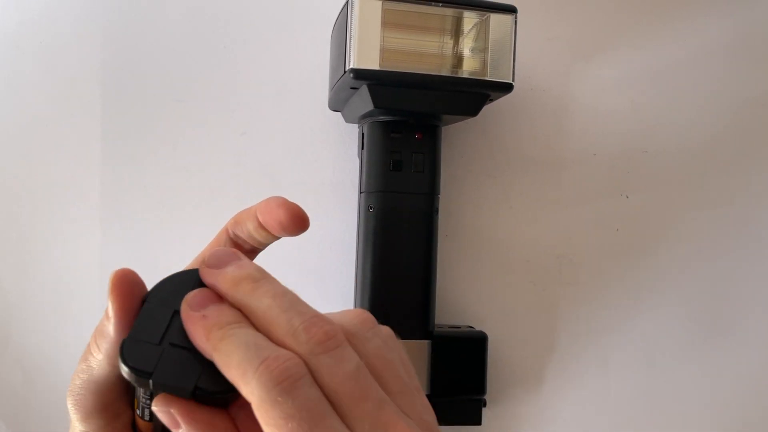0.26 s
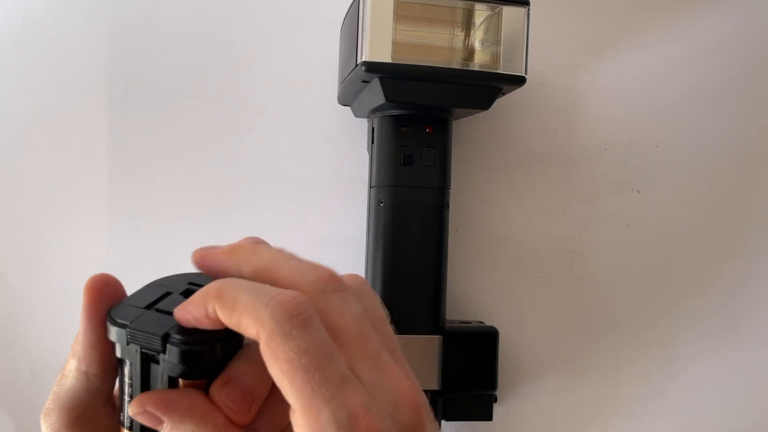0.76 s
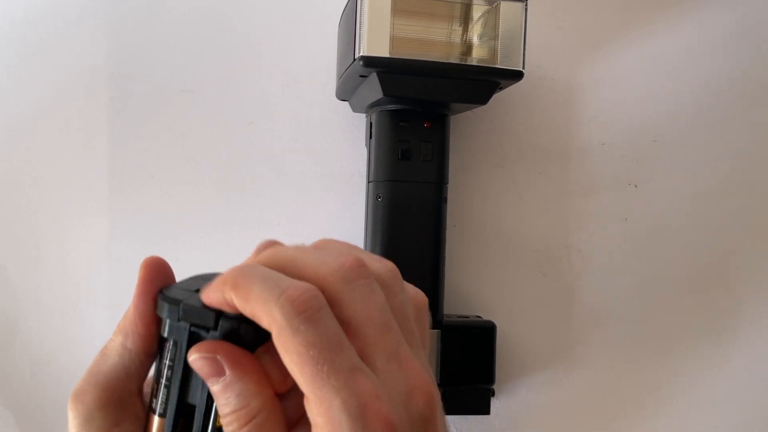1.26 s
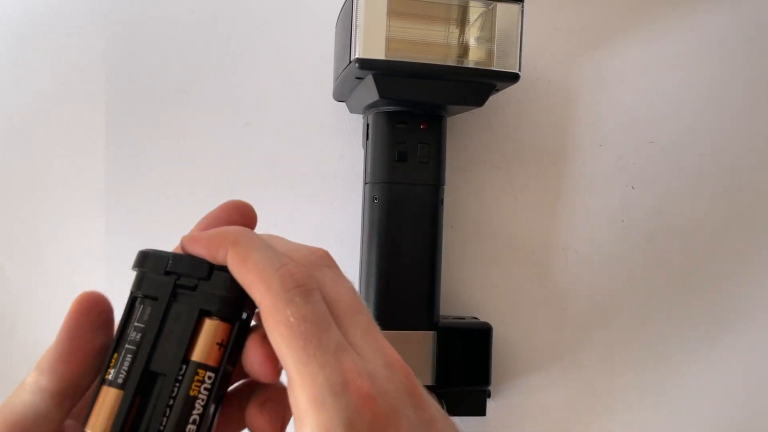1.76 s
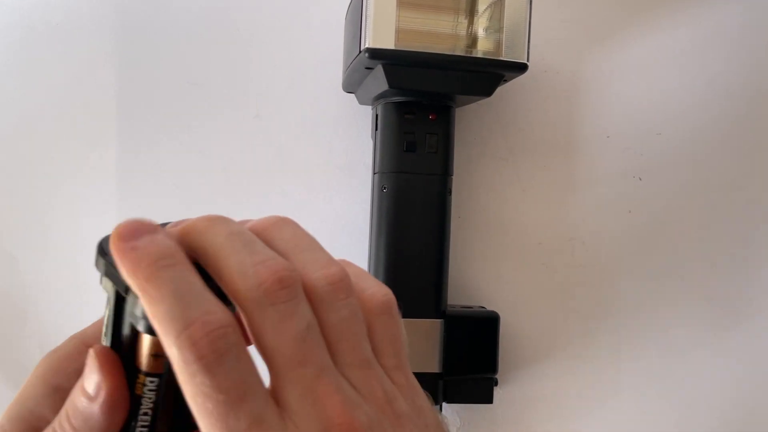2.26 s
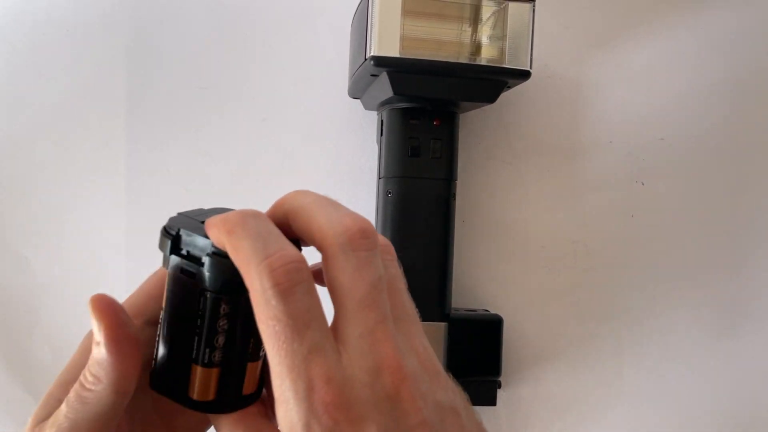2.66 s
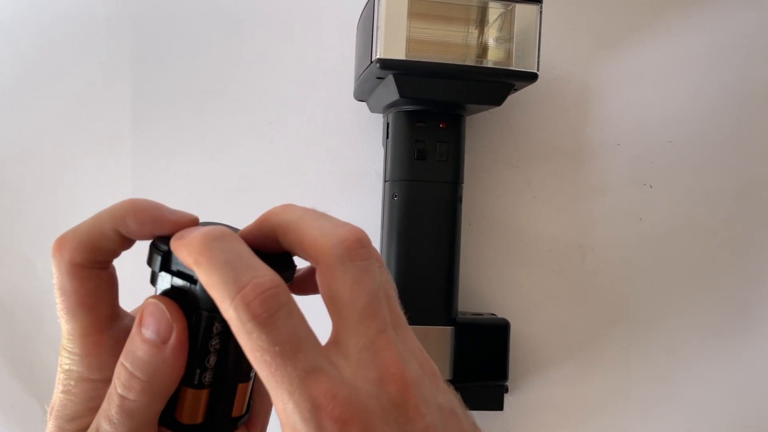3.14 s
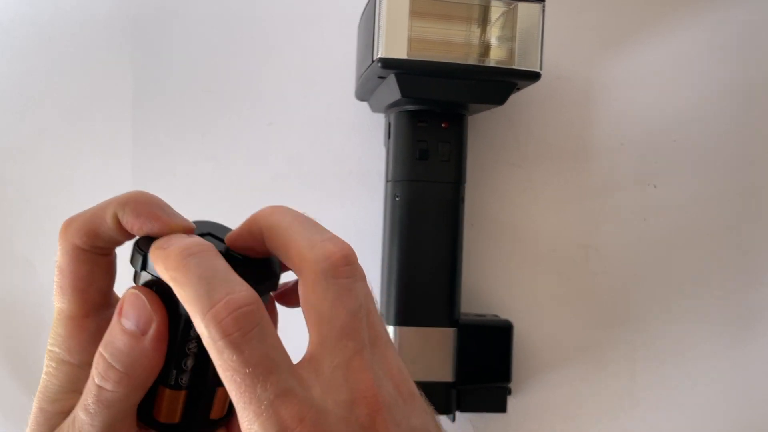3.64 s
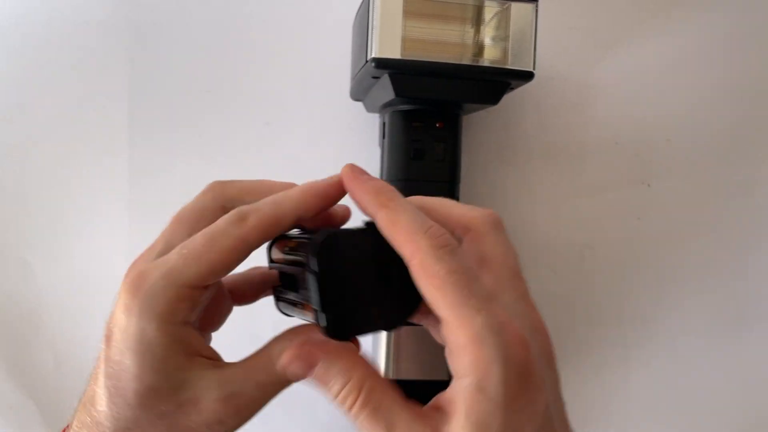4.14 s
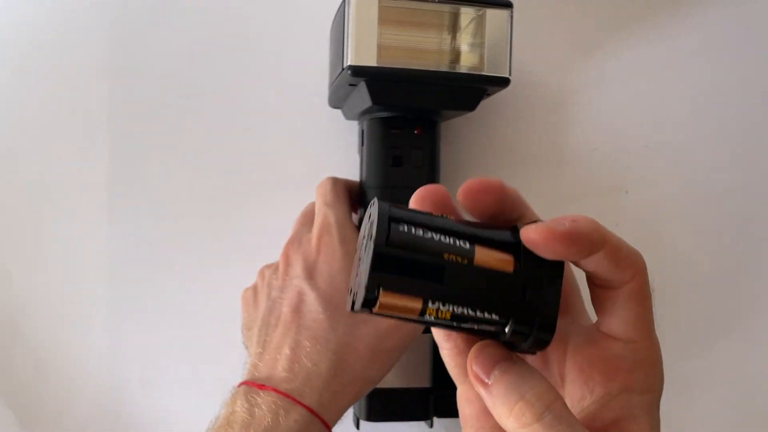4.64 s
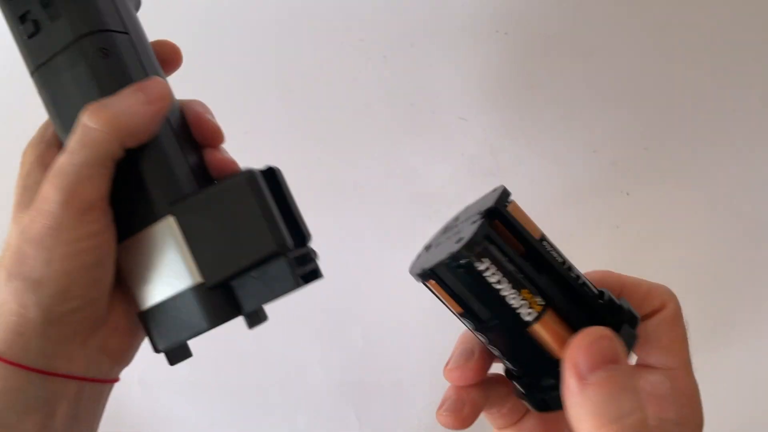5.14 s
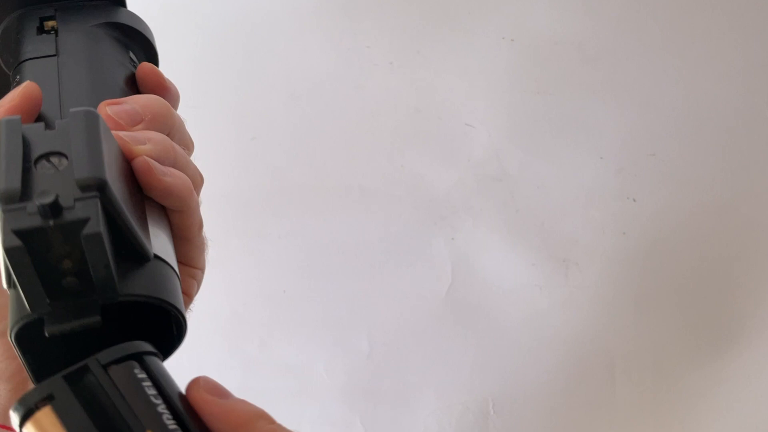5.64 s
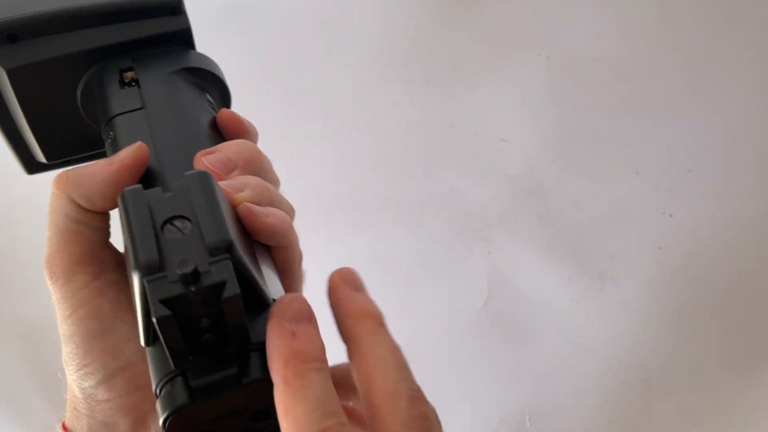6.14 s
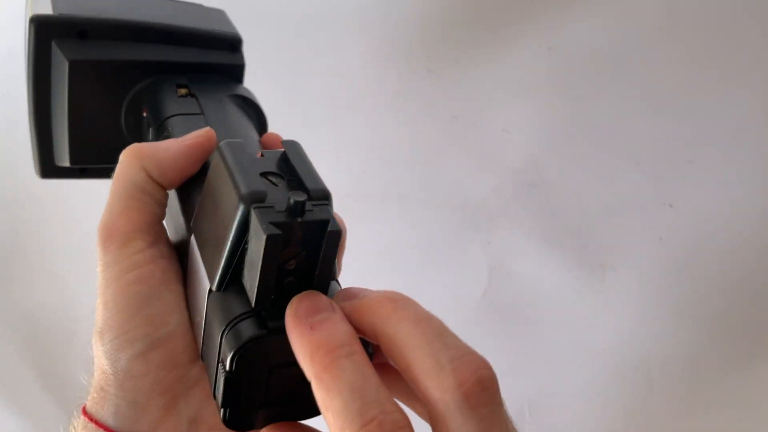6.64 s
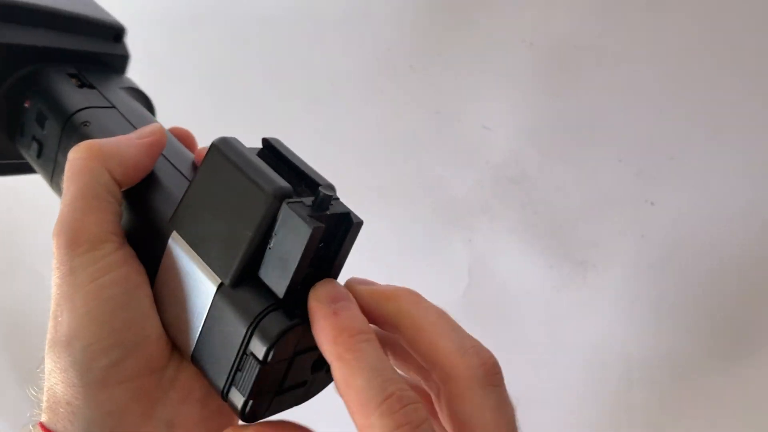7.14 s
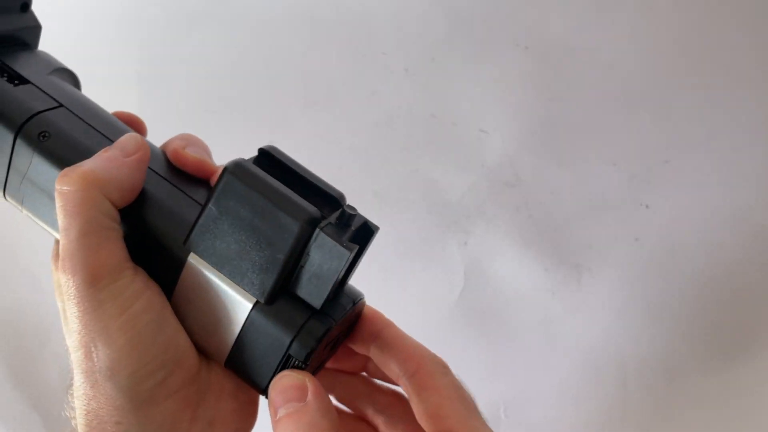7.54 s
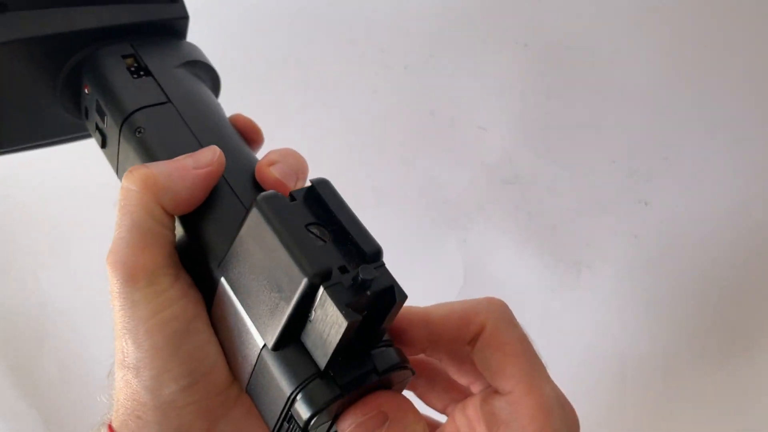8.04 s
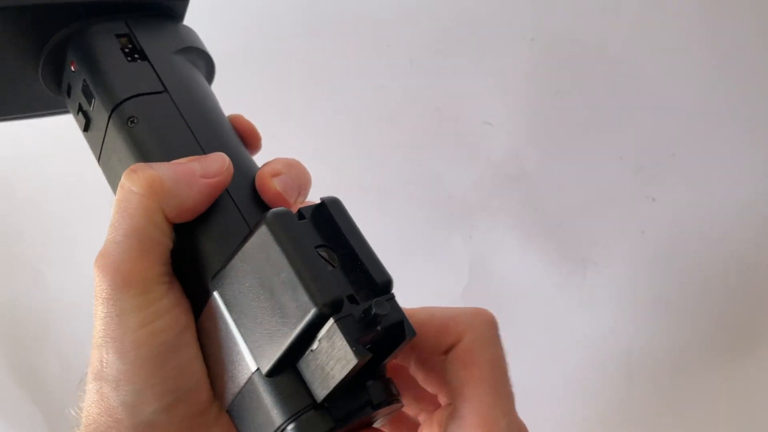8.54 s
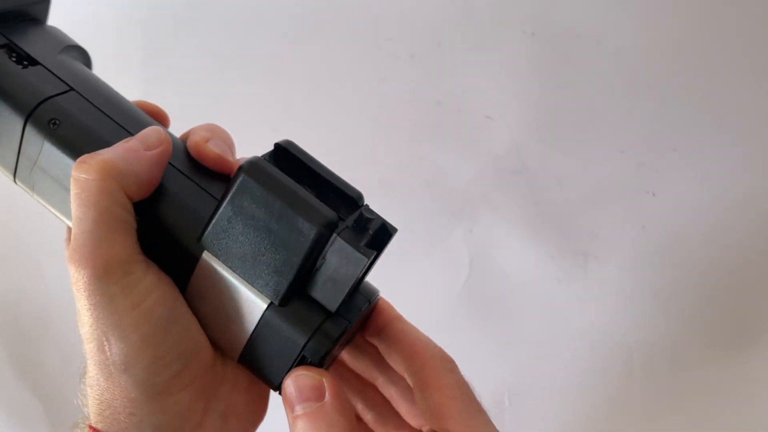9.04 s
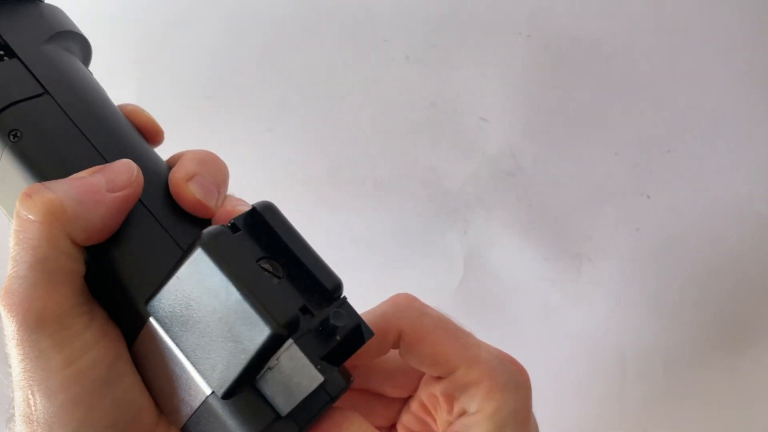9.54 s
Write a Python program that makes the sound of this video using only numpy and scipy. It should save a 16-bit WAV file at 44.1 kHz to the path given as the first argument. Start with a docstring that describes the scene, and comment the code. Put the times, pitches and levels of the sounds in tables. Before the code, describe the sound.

Dry, small plastic ticks come unevenly at first, with a modest bright snap. A soft low thump marks the handle being picked up, then quiet. Rubbing and hollow clatter lead to a hard clack as the holder enters, followed by busy knocks, creaks and sharp snaps of the catch. Close stereo pickup, wide image, dry room with faint rumble and hiss.

```python
"""Fingers work the lid of a plastic battery holder until it snaps shut, lift a hollow plastic flash handle
off the table, slide the holder in and press it until it latches: noise bursts ring damped modes.
Rubbing is jerky coloured noise, the open handle hums as a resonance, heavy moves add low damped sines.
A small quiet room with a far rumble of shaped noise; a widened stereo picture."""
import sys
import numpy as np
from scipy import signal
from scipy.fft import rfft, irfft, next_fast_len
from scipy.io import wavfile
from scipy.ndimage import uniform_filter1d

SR = 44100
rng = np.random.default_rng(int(sys.argv[2]) if len(sys.argv) > 2 else 0)


def wrap_up_sound(samples):
    """Save the sound to the file named by the first command line argument, as 16-bit audio."""
    columns = np.atleast_2d(samples).T
    # keep every value between -1 and 1, then stretch to whole-number steps
    tamed = np.clip(columns, -1, 1)
    steps = np.round(tamed * 32767).astype(np.int16)
    wavfile.write(sys.argv[1], SR, steps)


N = 431738


def from_db(db):
    """Decibels to amplitude."""
    return 10 ** (np.asarray(db) / 20)


def rms_one(x):
    """Scale to rms 1."""
    return x / np.sqrt(np.mean(x ** 2) + 1e-20)


def at_hz(points, hz):
    """Interpolate a table over log frequency."""
    point_hz, values = np.array(points)[:, 0], np.array(points)[:, 1]
    return np.interp(np.log(hz + 1), np.log(point_hz), values)


def pair(noise, alike):
    """Mix two noises as mid and side into left and right with the given likeness."""
    alike = np.clip(alike, -1, 1)
    mid = np.sqrt(1 + alike) * noise[0]
    side = np.sqrt(1 - alike) * noise[1]
    return mid + side * np.array([[1], [-1]])


def coloured(noise, spectrum, alike):
    """Stereo noise with a spectrum and a likeness by frequency; rms 1."""
    size = next_fast_len(N)
    gain = from_db(at_hz(spectrum, np.fft.rfftfreq(size, 1 / SR)))
    shaped = pair(rfft(noise, size), alike) * gain
    return rms_one(irfft(shaped, size)[:, :N])


def drift(rate_hz):
    """Slow random wander of rms 1: noise knots at 200 Hz, averaged twice."""
    slow = rng.standard_normal(int(N / SR * 200) + 2)
    width = max(int(100 / rate_hz), 1)
    for _ in range(2):
        slow = uniform_filter1d(slow, width)
    return np.interp(np.linspace(0, len(slow) - 1, N), np.arange(len(slow)), rms_one(slow))


def jerks(per_s, lasts_s, shape):
    """Random stick-slip jerks of uneven size, each dying exponentially."""
    sizes = from_db(4.0 * np.minimum(rng.exponential(1, shape), 3))
    impulses = (rng.random(shape) < per_s / SR) * sizes
    return signal.lfilter([1], [1, -np.exp(-1 / (lasts_s * SR))], impulses)


def resonance(x, hz, width_hz):
    """Two-pole band with about unit gain at its peak."""
    r = np.exp(-np.pi * width_hz / SR)
    zeros = np.array([1, 0, -1]) * (1 - r * r) / 2
    poles = [1, -2 * r * np.cos(2 * np.pi * hz / SR), r * r]
    return signal.lfilter(zeros, poles, x + 1e-18)


# rumble level: start_s, level_db (mean of the drift)
RUMBLE_LEVEL = [(0.0, -60), (1.25, -63), (2.18, -58), (3.52, -62), (4.58, -60), (5.26, -66), (5.92, -56.5),
                (6.6, -65.5), (7.47, -59.5), (9.27, -67.5), (9.79, -51)]
# rumble and hiss spectrum: freq_hz, density_db (per Hz)
AIR_SPECTRUM = [(20, -21), (60, 2.5), (135, -11), (195, -8), (270, -20), (575, -23), (1500, -36.5),
                (16000, -55)]
# left-right likeness: freq_hz, likeness (0 to 1)
AIR_WIDTH = [(130, .99), (700, .2), (7500, .8)]


def air():
    """Far low rumble that swells and sinks, over a faint hiss: one drifting shaped noise."""
    hz = np.fft.rfftfreq(next_fast_len(N), 1 / SR)
    level_db = np.interp(np.arange(N) / SR, *np.transpose(RUMBLE_LEVEL)) + 2.1 * drift(4.8)
    noise = rng.standard_normal((2, N))
    return from_db(level_db) * coloured(noise, AIR_SPECTRUM, at_hz(AIR_WIDTH, hz))


# low swings of table and hand under the heaviest moves: start_s, level_db
THUMP_STARTS = [(4.588, -36), (9.662, -38.5)]
THUMP_HZ, THUMP_T60_S = 109.6, 0.11


def thump():
    """Damped sines: table and hand swing after heavy moves."""
    out = np.zeros(N)
    for start_s, level_db in THUMP_STARTS:
        t = np.maximum(np.arange(N) / SR - start_s, 0)
        out += from_db(level_db - 60 * t / THUMP_T60_S) * np.sin(2 * np.pi * THUMP_HZ * t)
    return out


# contact brightness and the ring the grip leaves free: start_s, bright_db, free_hz, free_db
GRIP_SHIFTS = [(0, -7.5, 2536, -11.5), (3.7, -2.5, 2600, -5), (4.1, -0.5, 2990, -4), (5.5, -2, 2240, -6),
               (5.9, -6.5, 1890, 3), (7.2, -6.5, 2087, -13.5), (8.25, -3.5, 2710, 7.5),
               (8.6, -4.5, 2730, -1.5), (9.1, -2.5, 1770, -5.5)]


def grip_at(s):
    """Contact brightness, free ring pitch and its level, gliding as the hands shift."""
    times, *columns = np.transpose(GRIP_SHIFTS)
    return [np.interp(s, times, column) for column in columns]


# skin and plastic rubbing: start_s, end_s, level_db (before drift and jerks)
RUB_STROKES = [(0.778, 0.905, -65.5), (1.227, 1.31, -67), (2.67, 2.842, -68.5), (4.406, 4.581, -67.5),
               (5.233, 5.34, -81), (5.862, 5.94, -52), (6.012, 6.124, -52.5), (7.395, 7.564, -62.5),
               (7.661, 7.826, -57.5), (8.893, 9.133, -67), (9.555, 9.79, -63.5)]
# friction spectrum: freq_hz, density_db (per Hz)
RUB_SPECTRUM = [(120, -25.5), (300, -1.5), (900, 2.5), (2300, -3), (6000, -12.5), (16000, -27)]
SQUEAK_DB, SQUEAK_WIDTH_HZ = 1, 130
RUSTLE_HZ, RUSTLE_WIDTH_HZ = 4830, 2800


def rubbing():
    """Jerky friction noise: strokes swell, fade, squeak in the free ring; dry skin adds a bright band."""
    gritty = rng.standard_normal((2, N)) * (1 + 1.5 * jerks(150, .002, N))
    rough = coloured(gritty, RUB_SPECTRUM, 0.81) * from_db(5.6 * drift(15))
    t, out = np.arange(N) / SR, np.zeros((2, N))
    for start_s, end_s, level_db in RUB_STROKES:
        bright_db, free_hz, _ = grip_at(start_s)
        swell = np.clip((t - start_s) / .025, 0, 1)
        fade = from_db(level_db - 200 * np.maximum(t - end_s, 0))   # 200 dB/s
        stroke = rough * swell * fade
        squeak = from_db(SQUEAK_DB) * resonance(stroke, free_hz, SQUEAK_WIDTH_HZ)
        rustle = from_db(bright_db) * resonance(stroke, RUSTLE_HZ, RUSTLE_WIDTH_HZ)
        out += stroke + squeak + rustle
    return out


SHUT_S = 6.13   # the holder closes the handle's mouth
PIPE_HZ, PIPE_WIDTH_HZ, PIPE_DB = 332, 56, 11.5


def pipe(handled):
    """Air in the open handle resonates with its touches in the 0.5 s before its mouth closes."""
    t = np.arange(N) / SR
    sliding = (t > SHUT_S - .5) & (t < SHUT_S)
    return from_db(PIPE_DB) * resonance(handled * sliding, PIPE_HZ, PIPE_WIDTH_HZ)


def struck(modes, push, chance, spread_db=2.5, grip=0.025):
    """A push rings modes of random strength, detuned by the grip; the first 4 ms have rms 1."""
    t = np.arange(2000)[:, None] / SR
    hz, level_db, t60_s = np.transpose(modes)
    count = len(hz)
    hz = hz * (1 + grip * chance[1, :count])
    signs = (-1) ** np.arange(count)   # neighbours opposed: no gaps between
    strength = from_db(level_db + spread_db * chance[0, :count]) * signs
    ring = np.sin(2 * np.pi * hz * t) * from_db(-60 * t / t60_s) @ strength
    out = signal.fftconvolve(push, ring[None], axes=1)[:, :push.shape[1]]
    return out / np.sqrt(np.mean(out[:, :180] ** 2))


# metal contact modes: freq_hz, level_db, t60_s
CONTACT_MODES = [(4670, 4.5, 0.0011), (5496, 2.7, 0.0022), (6850, -2, 0.0031), (9750, 4.5, 0.00041),
                 (13300, -8.5, 0.001), (14600, -10, 0.00056)]
TAIL_T60_S, TAIL_LIKENESS = (0.32, 0.32, 0.084, 0.21), 0.62   # cavity, body, free ring, contacts
FREE_T60_S = 0.013
MIDDLING_DB = -30   # strength of an ordinary blow
SCUFF_DB = -46   # weaker touches drag out into a scuff


def blows(events, cavity, body, chatter_s):
    """Bursts of tiny contacts ring cavity, body, free ring and contacts; cells rattle, the room answers."""
    t = np.arange(14000) / SR
    out = np.zeros((2, N + len(t)))
    grit = rng.standard_normal((len(events), 3, len(t)))
    chance = rng.standard_normal((len(events), 4, 2, 8))
    rattles = 1 + .6 * jerks(60, .002, (len(events), len(t)))
    for event, noise, dice, rattle in zip(events, grit, chance, rattles):
        start_s, peak_db, hollow_db, bright_db, free_hz, tail_db, free_db = event
        # hard blows chatter longer, faint ones drag
        hardness = from_db(0.21 * max(peak_db - MIDDLING_DB, -6))
        lasts_s = chatter_s * hardness * (1 + .5 * max(SCUFF_DB - peak_db, 0))
        burst = noise[0] * np.minimum(t / 0.00048, 1) * np.exp(-(t / lasts_s) ** 2)
        tail_swell = from_db(tail_db) * np.minimum(t / 0.00097, 1)
        tail = tail_swell * rattle * pair(noise[1:], TAIL_LIKENESS)
        mode_sets = (cavity, body, [(free_hz, 0, FREE_T60_S)], CONTACT_MODES)
        levels_db = (hollow_db, 0, free_db, bright_db)
        start = round(start_s * SR)
        for modes, level_db, t60_s, part_dice in zip(mode_sets, levels_db, TAIL_T60_S, dice):
            sound = struck(modes, burst + tail * from_db(-60 * t / t60_s), part_dice)
            # 10.5 dB: the burst's rms lies below its peak
            out[:, start:start + len(t)] += from_db(peak_db + level_db - 10.5) * sound
    no_bass = signal.butter(2, 280, "high", fs=SR, output="sos")   # small things radiate no bass
    return signal.sosfilt(no_bass, out[:, :N])


# how strongly the hollows ring as the hands turn things: start_s, hollow_db
HOLLOWNESS = [(0, -12.5), (1.3, -13), (1.7, -30), (2.2, -4), (2.6, -35), (4.5, -1), (5.75, -4), (6.09, -19),
              (6.65, -30), (6.9, 0), (7.25, -19), (7.45, -2), (9.25, -9), (9.5, -4.5)]
HARDER_BRIGHTER = 0.031   # dB of contact ring per dB of strength


def ordinary(events, tail_rule):
    """Small blows take their colour from the grip; harder ones are brighter and leave more tail."""
    rows = []
    for start_s, peak_db in events:
        bright_db, free_hz, free_db = grip_at(start_s)
        hollow_db = np.interp(start_s, *np.transpose(HOLLOWNESS))
        harder_db = peak_db - MIDDLING_DB
        bright_db = bright_db + HARDER_BRIGHTER * harder_db
        tail_db = tail_rule[0] + tail_rule[1] * harder_db
        rows.append((start_s, peak_db, hollow_db, bright_db, free_hz, tail_db, free_db))
    return rows


SNAP_FREE_DB = -4   # free ring of a snap against the body


def snaps(rows):
    """Hard snaps of a catch carry their own colour; all share one free ring level."""
    return [row + (SNAP_FREE_DB,) for row in rows]


# knocks and creaks of the handle, first open, then with the holder inside: start_s, peak_db
HANDLE_KNOCKS = [(4.414, -47.5), (4.507, -54), (4.572, -62), (4.702, -60), (4.78, -63), (5.008, -64),
                 (5.049, -57.5), (5.313, -56.5), (5.524, -62.5), (5.675, -37.5), (5.725, -33.5),
                 (5.803, -31.5), (5.894, -35), (5.902, -33.5), (5.936, -35.5), (5.956, -34.5), (6.026, -46),
                 (6.084, -21.5), (6.099, -19), (6.447, -56), (6.608, -47), (6.686, -45.5), (6.771, -44.5),
                 (6.818, -33.5), (6.862, -41), (6.881, -32), (6.923, -34), (6.951, -45.5), (6.991, -41.5),
                 (7.04, -31.5), (7.06, -36), (7.077, -33.5), (7.148, -31.5), (7.208, -31.5), (7.268, -35.5),
                 (7.324, -29.5), (7.329, -35), (7.362, -38.5), (7.394, -35), (7.409, -35.5), (7.436, -31),
                 (7.457, -28.5), (7.5, -31.5), (7.686, -44), (7.723, -34), (7.822, -36), (8.101, -35.5),
                 (8.302, -37.5), (8.318, -33), (8.331, -30.5), (8.348, -36.5), (8.384, -29.5),
                 (8.411, -27.5), (8.433, -44), (8.474, -29), (8.494, -36), (8.499, -29), (8.542, -30),
                 (8.561, -27.5), (8.573, -36), (8.712, -33), (8.879, -51.5), (8.9, -41), (8.913, -38),
                 (8.943, -40), (9.042, -78), (9.101, -39.5), (9.127, -38.5), (9.143, -33), (9.163, -28.5),
                 (9.223, -24.5), (9.282, -21), (9.333, -30.5), (9.406, -30), (9.483, -33.5), (9.535, -26),
                 (9.561, -36.5)]
# catch snaps: start_s, peak_db, hollow_db, bright_db, free_hz, tail_db
HANDLE_SNAPS = [(6.126, -11, -6.5, -2, 2360, -22), (7.8051, -5.5, -3.5, -2, 1694, -22.5),
                (7.894, -15, -5, -5, 2530, -22), (9.661, -14.5, -6.5, 6.5, 2300, -24)]
# handle hollow modes: freq_hz, level_db, t60_s
HANDLE_CAVITY_MODES = [(327, -15, 0.036), (686, 0.5, 0.013), (942, -7.5, 0.016), (1150, -5, 0.022)]
# handle body modes: freq_hz, level_db, t60_s
HANDLE_BODY_MODES = [(1390, -4.5, 0.0038), (1698, -4.5, 0.01), (2440, -1, 0.004), (2660, 3.5, 0.004),
                     (3598, -3, 0.0016)]
HANDLE_TAIL = (-21.5, 0.12)   # dB under a middling blow, dB per dB of strength


def handle_blows():
    """Knocks, creaks and latch snaps ring the handle's shell and hollow."""
    events = ordinary(HANDLE_KNOCKS, HANDLE_TAIL) + snaps(HANDLE_SNAPS)
    return blows(events, HANDLE_CAVITY_MODES, HANDLE_BODY_MODES, chatter_s=0.0048)


# clicks of lid and cells in the holder: start_s, peak_db
HOLDER_TICKS = [(0.076, -39), (0.155, -37), (0.207, -43), (0.224, -38), (0.2639, -33.5), (0.3524, -28),
                (0.427, -36), (0.4727, -27), (0.49, -36), (0.5857, -43), (0.793, -53.5), (0.841, -38),
                (0.86, -39), (0.8804, -34.5), (0.948, -39.5), (0.9962, -37.5), (1.075, -38.5), (1.199, -60),
                (1.257, -42), (1.278, -35.5), (1.306, -52), (1.35, -51.5), (1.67, -41), (1.747, -45),
                (1.803, -43.5), (1.8319, -39.5), (1.9805, -39.5), (2.0334, -42), (2.059, -27.5),
                (2.132, -41), (2.215, -48), (2.2325, -37.5), (2.284, -48.5), (2.578, -37.5), (2.598, -42),
                (2.6732, -50), (2.708, -50.5), (2.783, -42.5), (2.805, -53), (2.821, -40.5), (2.969, -46.5),
                (3.1114, -37.5), (3.1387, -31), (3.1638, -36.5), (3.2011, -35.5), (3.2431, -37),
                (3.299, -40.5), (3.354, -28), (3.479, -40.5), (3.592, -38), (3.6193, -37), (3.67, -45),
                (4.093, -51.5), (4.147, -44.5), (4.1968, -55)]
# lid snap: start_s, peak_db, hollow_db, bright_db, free_hz, tail_db
HOLDER_SNAP = [(3.338, -24, -30.5, 5.5, 2000, -5.5)]
# cell well modes: freq_hz, level_db, t60_s
WELL_MODES = [(1200, 0, 0.0069)]
# holder body modes: freq_hz, level_db, t60_s
HOLDER_BODY_MODES = [(2250, -2, 0.0067), (3250, 4, 0.0014)]
HOLDER_TAIL = (-19.5, 0.17)   # dB under a middling blow, dB per dB of strength


def holder_blows():
    """Lid and cell clicks and the lid snap ring the holder's body and wells."""
    events = ordinary(HOLDER_TICKS, HOLDER_TAIL) + snaps(HOLDER_SNAP)
    return blows(events, WELL_MODES, HOLDER_BODY_MODES, chatter_s=0.006)


def scene():
    """Room, thumps, handle with rubbing and pipe hum, holder."""
    handled = handle_blows() + rubbing()
    return air() + thump() + pipe(handled) + handled + holder_blows()


# phase turn of the right channel against the left, by frequency: freq_hz, turn_rad
STEREO_PHASE = [(0, 0), (1750, .1), (3100, 1.7), (4400, 1.2), (4900, -1), (7200, 3.1), (8300, 3.3),
                (10400, 6.2), (17000, 11)]
CUTOFF_HZ = 16700


def record(dry):
    """The right channel's phase turns to widen the stereo, the highest peaks are rounded, the top is cut."""
    size = next_fast_len(N + 4096)
    turn_rad = np.interp(np.fft.rfftfreq(size, 1 / SR), *np.transpose(STEREO_PHASE))
    right = irfft(rfft(dry[1], size) * np.exp(-1j * turn_rad), size)[:N]
    rounded = np.tanh([dry[0], right])
    top_cut = signal.cheby2(12, 70, CUTOFF_HZ * 1.04, fs=SR, output="sos")   # stopband edge 4 % up
    return signal.sosfilt(top_cut, rounded)


dry = scene()
out = record(dry)
wrap_up_sound(out)
```